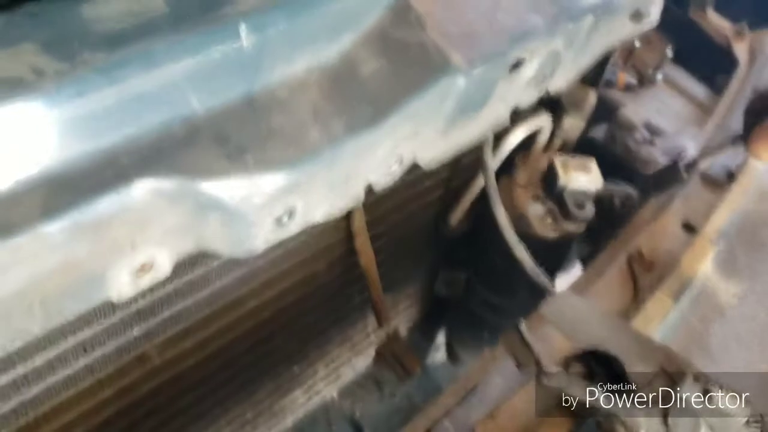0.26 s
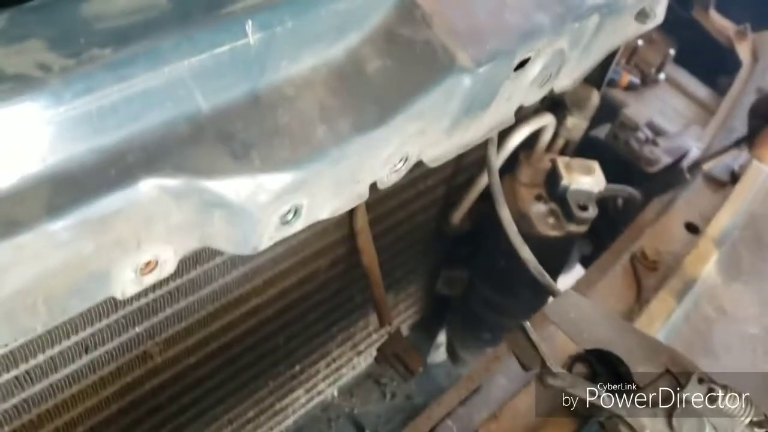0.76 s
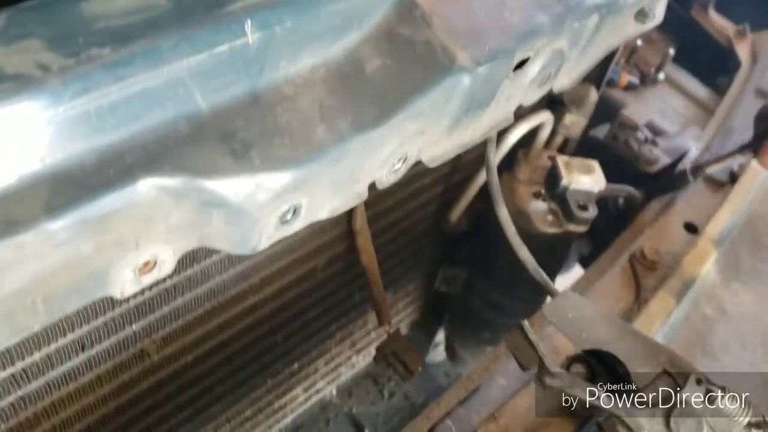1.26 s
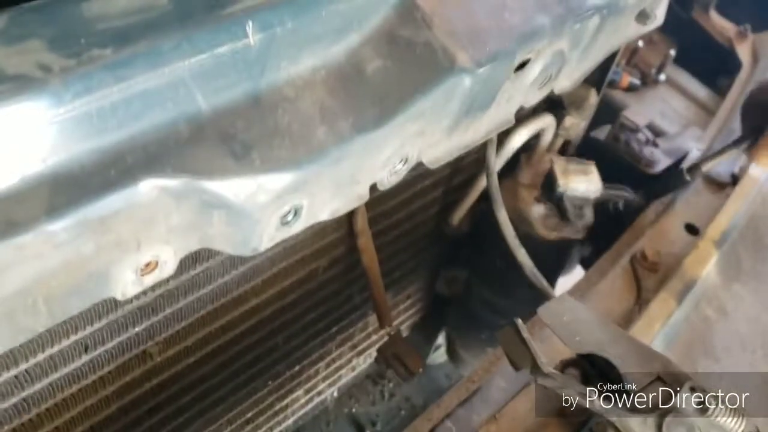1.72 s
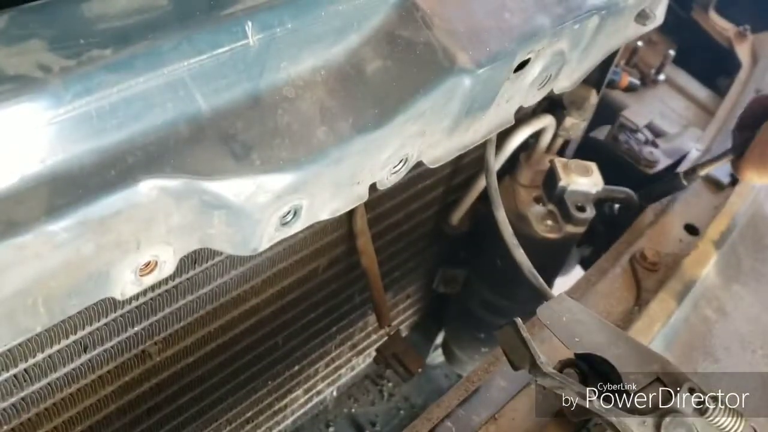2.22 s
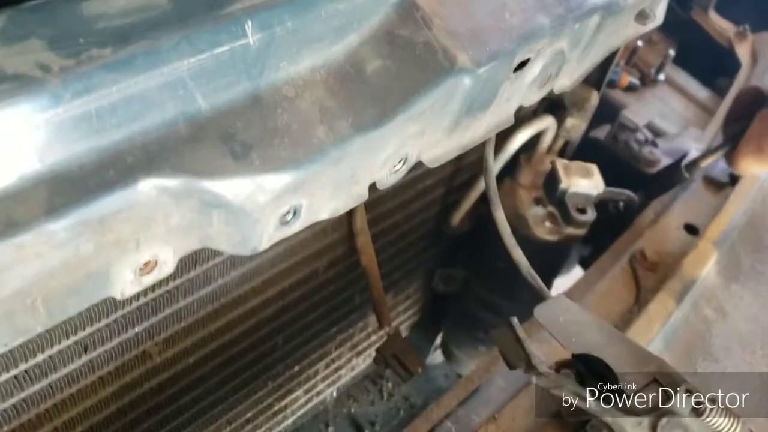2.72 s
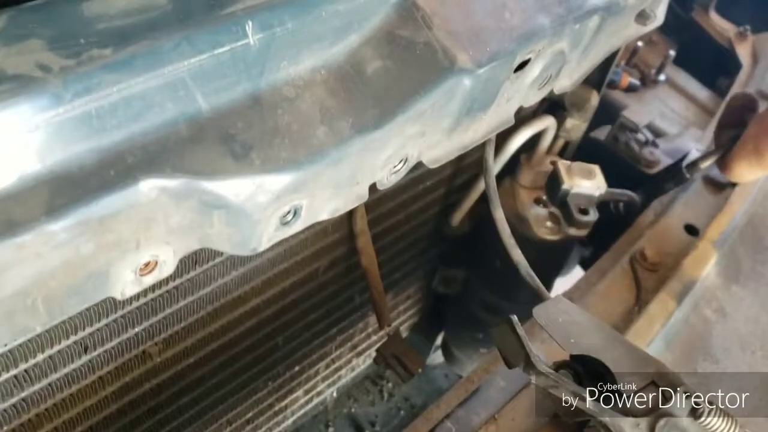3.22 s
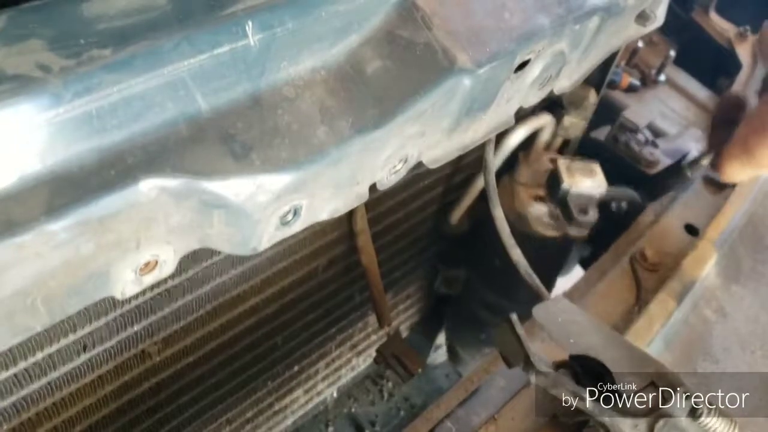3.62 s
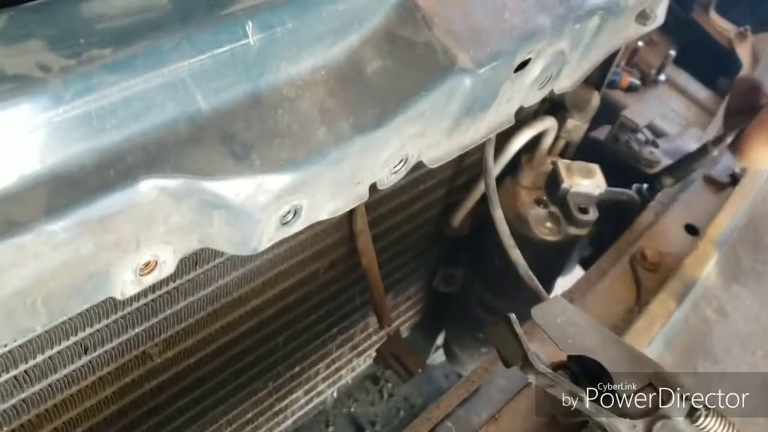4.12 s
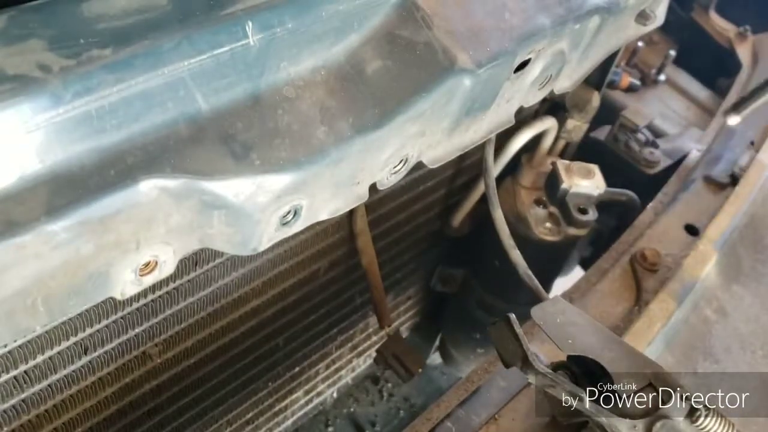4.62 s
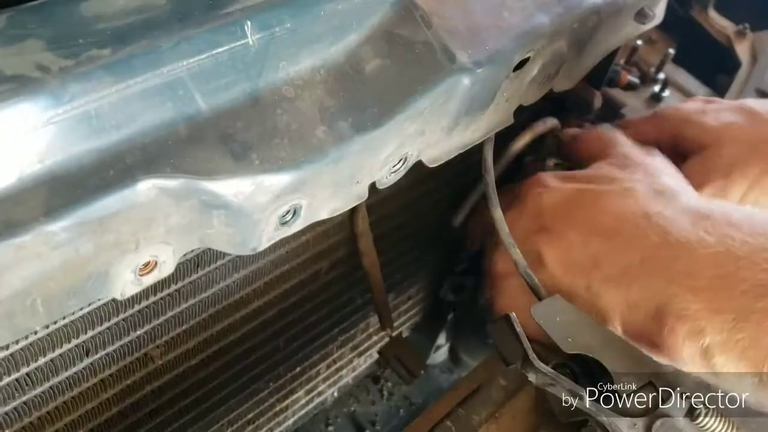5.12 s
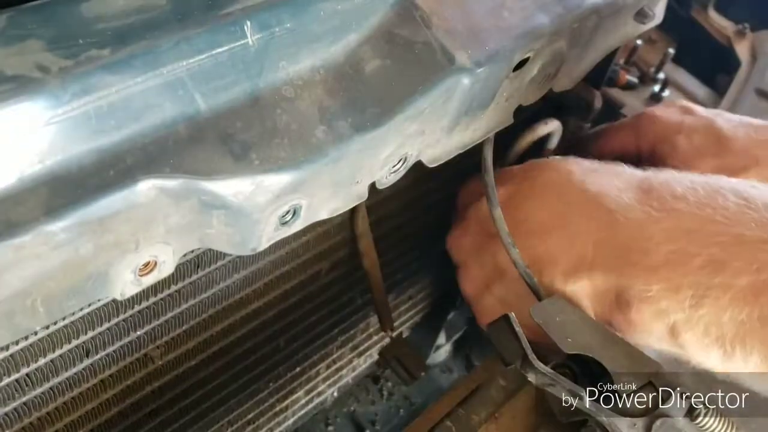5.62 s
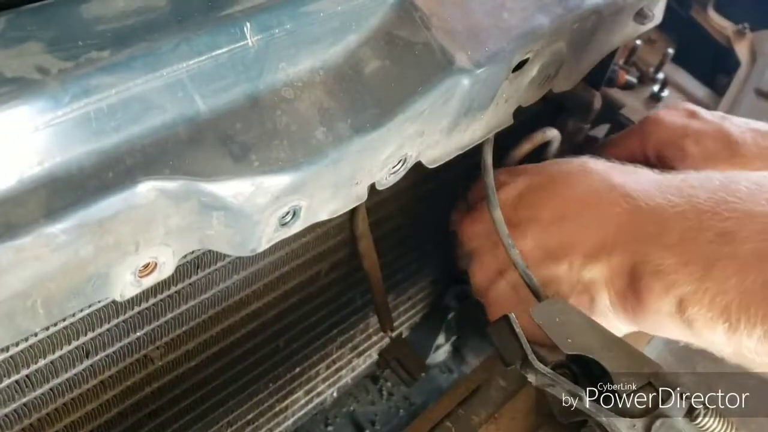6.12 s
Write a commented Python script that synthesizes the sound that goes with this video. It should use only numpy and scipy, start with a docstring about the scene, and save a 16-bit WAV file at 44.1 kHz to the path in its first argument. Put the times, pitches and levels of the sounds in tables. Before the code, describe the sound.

Close up in a car's engine bay, a cordless ratchet starts with a faint high whistle and runs steadily for under two seconds, buzzing and clacking rapidly. After a pause come three short, rough, loaded bursts, the last longest. Then a few dull knocks and a bright steel clank, another double knock, and a tiny metal squeak. Faint machine hum in a small, fairly dry garage.

```python
"""Cordless ratchet in an engine bay

A cordless ratchet works on fittings close by: one long run, then three short bursts. At each start its
motor whistles as two parting tones; the gears growl as noise and hum as harmonics of the stroke rate, and
the pawl clacks in splashes of noise at each swing of the yoke. Knocks on the car (noise and decaying modes)
fall among and after the bursts; a stick-slip metal squeak ends the scene, in a garage where a machine hums.
"""
import sys
import numpy as np
from scipy import signal
from scipy.fft import rfft, irfft
from scipy.io import wavfile
from scipy.ndimage import uniform_filter1d

SR = 44100
rng = np.random.default_rng(int(sys.argv[2]) if len(sys.argv) > 2 else 0)


def dump_mix(stems):
    """Bounce the given channels to the path in sys.argv[1] as a 16-bit WAV at rate SR."""
    frames = np.atleast_2d(stems).T  # one column per channel
    limited = np.clip(frames, -1, 1)  # hard clip at full scale
    pcm = np.round(limited * 32767).astype(np.int16)
    wavfile.write(sys.argv[1], SR, pcm)


N = 280476

# All levels are relative, ahead of the trims in the functions.
# Hum of a machine in the garage: pitch_hz, level_db, level_in_quiet_stretch_db
MACHINE_HUM = [(81.9, -47.5, -62.5), (164, -45, -64), (240, -47.5, -65.5), (325.5, -51, -77),
               (472, -57.5, -78.5), (529, -52, -79.5), (837, -62, -81.5), (928, -58.5, -87)]
# Spectral density of the garage air, outside and inside the quiet stretch: frequency_hz, density_db
GARAGE_AIR = [(15, -41), (25, -8.5), (71, -0.5), (131, -8), (158, -1), (191, -13.5), (237, 1), (293, -14.5),
              (326, -15), (475, -3.5), (655, -11.5), (1120, -13.5), (6040, -26.5), (8780, -34.5),
              (15000, -31.5)]
QUIET_AIR = [(15, -35.5), (25, -6.5), (150, -1.5), (191, -13.5), (237, -2.5), (286, -14), (501, -8),
             (604, -12), (6900, -30), (8780, -40), (15000, -34.5)]
# Reverberation time of the garage: frequency_hz, t60_s
GARAGE_T60 = [(150, .6), (1000, 0.39), (4000, 0.32), (14000, 0.13)]
# Side against mid of noise and gear hum in the stereo image: frequency_hz, side_to_mid_db
STEREO_WIDTH = [(30, -3), (65, -7), (140, -15), (280, -11), (550, -4), (1100, 0), (4000, 1), (14000, -1)]
# Path of the squeaking fitting: time_s, pitch_hz, level_db
SQUEAK_PATH = [(6.328, 1370, -38), (6.336, 1334, -33), (6.347, 1417, -27), (6.36, 1340, -40)]
# Partials of the squeak: multiple (of the pitch), level_db
SQUEAK_PARTIALS = [(1, -2.5), (2, -3), (3, -10), (4, -21), (5, -19)]
# Modes of a struck steel bracket: frequency_hz, level_db, t60_s (before t60_scale)
BRACKET_MODES = [(1130, -4.5, 0.25), (1389, -1.5, 0.31), (1561, -2, 0.21), (1840, 0, 0.33),
                 (2751, -7, 0.33), (2912, -8, 0.27), (4780, -3, 0.2)]
# Knocks of tool and hand on the car: start_s, body_db, clash_to_body_db, chatter_s, resonance_hz, tick_to_clash_db
CAR_KNOCKS = [(2.30, -64, -18, 0.026, 700, -8), (2.529, -62.5, -3.5, 0.0046, 900, -8),
              (4.148, -60.5, 6.5, 0.027, 905, -4), (4.177, -36.5, -9, 0.0051, 836, 6),
              (4.215, -36.5, -18, 0.0053, 896, 5), (4.326, -53, -3, .006, 1900, -12),
              (4.339, -51.5, 2, 0.0086, 2030, -9), (4.460, -34.5, -0.5, 0.017, 600, 0),
              (4.4834, -28, 10, 0.0089, 1316, 0), (5.2771, -31, 1, 0.0046, 1950, -22),
              (5.285, -28, -25, 0.0018, 567, -20)]
# Spectral density of a knock's dull panel, bright clash and treble tick: frequency_hz, density_db
PANEL_COLOUR = [(60, -6.5), (250, -2), (550, 1.5), (950, 2.5), (1600, -13), (4000, -19.5), (15000, -35)]
CLASH_COLOUR = [(200, -24.5), (900, -7.5), (1900, 2), (3200, -5), (6500, -6), (9000, -18), (14500, -25)]
TICK_COLOUR = [(2000, -45), (8000, -16), (10500, -5), (14500, 1)]
# Modes of the steel socket: frequency_hz, level_db, t60_s
SOCKET_MODES = [(4021, -26.5, 0.29), (6067, -46.5, .3), (6761, -42, .3)]
# Pulls of the trigger: trigger_s, bite_s, release_s, growl_at_release_db, rasp_at_release_db,
# load_build_up_db (from bite to release), first_pawl_tick_db
TRIGGER_PULLS = [(0.101, 0.161, 1.825, -28, -22, 0, -29.5), (2.581, 2.641, 2.755, -23, -15.5, 13.5, -35),
                 (3.023, 3.071, 3.232, -23.5, -17.5, 6.5, -60.5), (3.4558, 3.523, 3.88, -20.5, -12, 7, -28)]
# The tool spinning freely at one speed: time_s, steady_hum_share (0-1)
FREE_SPIN = [(.17, 0), (.33, .85), (.6, .96), (1.42, .95), (1.52, 0)]
# Harmonics of the gear hum: multiple (of the stroke rate), level_db
GEAR_HARMONICS = [(1, -18.5), (2, -11.5), (3, -5), (4, 1), (5, -25), (6, -3.5), (7, -5.5), (8, -7),
                  (9, -13), (10, -7), (11, -9), (12, -9), (13, -19.5), (14, -23), (15, -8.5), (16, -11),
                  (17, -20), (18, -19), (19, -18.5), (20, -17.5), (21, -11.5), (22, -16.5), (23, -7.5),
                  (24, -10.5), (25, -16), (26, -22.5), (27, -19), (28, -16.5)]
# Spectral density of gear growl, panel rumble and steel parts: frequency_hz, density_db
GROWL_COLOUR = [(30, -33), (68, -4), (95, -9.5), (145, 0), (180, 0), (230, 2), (330, -.5), (440, 2.5),
                (650, -1), (900, -6), (1300, -13.5), (2000, -9.5), (5000, -19)]
RUMBLE_COLOUR = [(28, -45.5), (52, -24), (68, 0), (85, -2), (130, -26.5), (600, -69)]
STEEL_COLOUR = [(100, -20.5), (400, -1.5), (900, -2), (1300, -0.5), (1900, -5), (2700, 2), (3400, 0),
                (4300, 1.5), (5500, -2.5), (7000, -2), (8700, -8.5), (10500, -3.5), (14500, 0), (16000, -4)]
# Stretches of ratcheting under load: first_stroke_s, end_s, stroke_gap_s, gap_growth_s (with each stroke)
LOADED_STRETCHES = [(.169, .235, .0222, -.0018), (1.4855, 1.93, .0208, .0004), (2.652, 2.79, .0215, .0014),
                    (3.068, 3.34, .0243, .00046), (3.523, 3.86, .0282, -.0002)]
# Strength of the clacks in each of those stretches: level_db
LOADED_LEVELS = [-14.5, -14.8, -9.5, -13.5, -10]
# Hard catches of the pawl: start_s, level_db
HARD_CATCHES = [(0.2105, -9.5), (1.7882, -9.5), (1.8185, -11.5), (2.6973, -10), (2.7246, -8.5),
                (3.0664, -14.5), (3.12, -12), (3.1642, -7.5), (3.1955, -10.5), (3.2782, -17.5),
                (3.551, -10), (3.583, -11), (3.6312, -6.5), (3.691, -7.5)]

# the background is much quieter between these times (s)
QUIET_FROM_S, QUIET_TO_S = 0.093, 4.956
# the tool kicks, and its socket is set ringing (s)
THUMP_S, RING_S = 2.675, 2.725
# single strokes, drive and return alike, per second, and the limits of the free run's clacks
STROKE_HZ, FREE_FROM_S, FREE_TO_S = 56.55, .2432, 1.475
# every pull: the motor takes up the slack, bites quickly and coasts down after the release
SLACK_S, SLACK_DB, BITE_S = .024, -21.5, .016
GROWL_COAST_DB_PER_S, RASP_COAST_DB_PER_S, CLACK_COAST_DB_PER_S = 225.5, 290, 140.5
# share of the load's build-up that the clacks follow (0-1), their scatter (dB), contact at full force (s)
CLACK_LOAD_SHARE, CLACK_SCATTER_DB, CHATTER_S = .5, 0.9, .0045
TOP_HZ = 15500


def undb(db):
    """Logarithmic level: decibels become an amplitude ratio."""
    return 10 ** (np.asarray(db) / 20)


def unit(x):
    """Normalisation: a signal is scaled to an rms of 1."""
    return x / np.sqrt(np.mean(x ** 2))


def clock(size=N):
    """Uniform sampling: sample times in seconds."""
    return np.arange(size) / SR


def fade(t, t60):
    """Exponential damping: amplitude is 60 dB down after t60."""
    return np.exp(-np.log(1000) * t / t60)


def on_log(hz, points):
    """Logarithmic frequency scale: (Hz, value) points are interpolated along it."""
    f, value = np.transpose(points)
    return np.interp(np.log(np.maximum(hz, 1)), np.log(f), value)


def walk(rate):
    """Low-pass fluctuation: random steps, rate per second, are smoothed twice and scaled to an rms of 1."""
    size = int(SR / rate)
    held = np.repeat(rng.standard_normal(N // size + 1), size)
    return unit(uniform_filter1d(uniform_filter1d(held, size), size)[:N])


def noise(colour, size=N, ripple_db=0., ripple_hz=120):
    """Partial coherence: coloured noise at two microphones is alike in the bass; ripple stands for resonances."""
    hz = np.fft.rfftfreq(size, 1 / SR)
    mid, side = np.exp(2j * np.pi * rng.random((2, len(hz))))
    width = undb(on_log(hz, STEREO_WIDTH))
    pair = np.array([mid + width * side, mid - width * side]) / np.hypot(1, width)
    ripple = np.interp(hz / ripple_hz, np.arange(2 ** 10), rng.standard_normal(2 ** 10))
    ripple = ripple * np.minimum(hz / 1000, 1)  # weaker below 1 kHz
    spectrum = pair * undb(on_log(hz, colour) + ripple_db * ripple)
    return unit(irfft(spectrum, size))


def partials(hz, orders, blur=1., start_s=0.):
    """Harmonic synthesis: multiples of a moving pitch, rms 1; little blur aligns the low ones into a thud a cycle."""
    turn = np.cumsum(hz) / SR
    turn = turn - np.interp(start_s, clock(), turn)
    turn = (turn % 1).astype(np.float32)
    total = 0
    for multiple, db in orders:
        phase = float(min(blur * multiple, 1) * rng.random())
        total = total + float(undb(db)) * np.sin(2 * np.pi * (round(multiple) * turn + phase))
    return unit(total)


def blows(rows, snap, t60, bay_db, bay_t60):
    """Impact envelope: hard first contact, chatter, a short ring and bay reflections add in power."""
    power, age = np.zeros(N + SR), clock(SR // 3)
    first_contact = 1 + snap * fade(age, 0.0025)
    reflections = undb(bay_db) * fade(age, bay_t60)
    for s, db, chatter_s in rows:
        contact = first_contact * fade(np.maximum(age - chatter_s, 0), t60)
        start = int(s * SR)
        power[start:start + len(age)] += undb(db) ** 2 * (contact ** 2 + reflections ** 2)
    return np.sqrt(power[:N])


def background(shop_db=-39.5, lull_db=-59.0, swell_db_per_s=3.0, lull_rise_db_per_s=1.7, drop_db=-9, drop_t60=.25):
    """Tones in broadband flow noise: hum and air drop, creep up through the quiet stretch, then return at once."""
    t = clock()
    quiet = (t > QUIET_FROM_S) & (t < QUIET_TO_S)
    creep_db = lull_rise_db_per_s * (t - t.mean())
    hum = 0
    for hz, db, quiet_db in MACHINE_HUM:
        level_db = np.where(quiet, quiet_db + creep_db, db) + 1.9 * walk(7.8)
        pitch = hz * (1 + .006 * walk(11))
        hum = hum + undb(level_db) * np.sin(2 * np.pi * np.cumsum(pitch) / SR)
    late_swell_db = swell_db_per_s * np.maximum(t - 5.6, 0)
    air = noise(GARAGE_AIR) * undb(shop_db + 0.89 * walk(14) + late_swell_db)
    lull = noise(QUIET_AIR) * undb(lull_db + creep_db + walk(12))
    dying = undb(drop_db) * fade(np.maximum(t - QUIET_FROM_S, 0), drop_t60)
    return hum + np.where(quiet, lull + dying * air, air)


def garage(x, wet_db=-16, build_s=0.0065, size=32768):
    """Diffuse reverberation: convolution with a noise tail whose treble dies first."""
    t, hz = clock(size), np.fft.rfftfreq(size, 1 / SR)
    white = rfft(noise([(20, 0), (20000, 0)], size))
    octave = np.round(np.log2(np.maximum(hz, 2 ** 6)))
    tail = 0
    for k in np.unique(octave):
        band = irfft(white * (octave == k))
        tail = tail + band * fade(t, on_log(2 ** k, GARAGE_T60))
    tail = unit(tail * (1 - np.exp(-t / build_s))) / np.sqrt(size)
    return undb(wet_db) * signal.fftconvolve(x, tail, axes=1)[:, :N]


def squeak():
    """Stick-slip friction: metal gives a high harmonic tone, unsteady in rate and strength."""
    s, hz, db = np.transpose(SQUEAK_PATH)
    pitch = np.interp(clock(), s, hz) * (1 + .022 * walk(500))
    level_db = np.interp(clock(), s, db, left=-np.inf) + 2 * walk(400)
    return partials(pitch, SQUEAK_PARTIALS) * undb(level_db)


def bracket(db=-33, t60_scale=0.97):
    """Modal ringing: every knock excites a steel bracket in proportion to its bright clash."""
    age = clock(SR // 2)
    top_db = max(mode[1] for mode in BRACKET_MODES)
    ring = 0
    for hz, mode_db, t60 in BRACKET_MODES:
        tone = np.sin(2 * np.pi * (hz * age + rng.random((2, 1))))  # one phase per channel
        ring = ring + undb(mode_db - top_db) * tone * fade(age, t60 * t60_scale)
    hardest_db = max(body + clash for _, body, clash, *_ in CAR_KNOCKS)
    out = np.zeros((2, N + SR))
    for s, body, clash, *_ in CAR_KNOCKS:
        start = int(s * SR)
        out[:, start:start + len(age)] += undb(db + body + clash - hardest_db) * ring
    return out[:, :N]


def knocks(ring_db=1.0, ring_t60=0.073):
    """Impact excitation: a dull sheet-metal body, a bright steel clash, its tick and one main resonance."""
    s, db, clash, chatter, hz, tick = np.transpose(CAR_KNOCKS)
    dull = blows(zip(s, db, chatter), snap=0.18, t60=0.064, bay_db=-6.5, bay_t60=0.25)
    bright = blows(zip(s, db + clash, chatter), snap=0.77, t60=0.031, bay_db=-5.0, bay_t60=0.22)
    sharp = blows(zip(s, db + clash + tick, chatter), snap=0.8, t60=0.03, bay_db=-6, bay_t60=0.18)
    ring, age = np.zeros(N + SR), clock(SR // 4)
    for start, blow_db, ring_hz in zip((s * SR).astype(int), db, hz):
        tone = np.sin(2 * np.pi * ring_hz * age) * fade(age, ring_t60)
        ring[start:start + len(age)] += undb(blow_db + ring_db) * tone
    body = dull * noise(PANEL_COLOUR, ripple_db=1.5)
    steel = bright * noise(CLASH_COLOUR, ripple_db=1.2)
    return body + steel + sharp * noise(TICK_COLOUR) + ring[:N]


def jolt(thump_hz=75, thump_db=-16, thump_t60=0.067, ring_spread_hz=130):
    """Free vibration: one kick thumps low through the car, then the loose socket rings at unsteady pitch."""
    age = np.maximum(clock() - THUMP_S, 0)
    thump = -undb(thump_db) * np.sin(2 * np.pi * thump_hz * age) * fade(age, thump_t60)
    age = np.maximum(clock() - RING_S, 0)
    rattle = np.cumsum(ring_spread_hz * walk(300) * (age > 0)) / SR  # shared phase wander, cycles
    ring = 0
    for hz, db, t60 in SOCKET_MODES:
        ring = ring + undb(db) * np.sin(2 * np.pi * (hz * age + rattle)) * fade(age, t60)
    return thump + ring


def motor_whistle(switch_hz=9950, spread_hz_per_s=9000, db=-55, length_s=0.051):
    """Amplitude modulation: the drive's switching tone splits into sidebands that part as the rotor speeds up."""
    out = np.zeros(N)
    for s, *_ in TRIGGER_PULLS:
        age = np.clip(clock() - s, 0, length_s)
        swell = np.sqrt(np.abs(np.sin(np.pi * age / length_s)))
        modulation = np.cos(np.pi * spread_hz_per_s * age ** 2)
        out += swell * np.sin(2 * np.pi * switch_hz * age) * modulation
    return 2 * undb(db) * out  # each sideband carries half the product


def drive(t, pull, coast_db_per_s, load_share=1):
    """Loaded drive: gain through slack, bite, a load that builds until the release, then coasting."""
    trigger, bite, release, _, _, build_db, _ = pull
    attack_db = np.interp(t, [bite - BITE_S, bite], [SLACK_DB, 0])
    load_db = load_share * np.interp(t, [bite, release], [-build_db, 0])
    coast_db = coast_db_per_s * np.maximum(t - release, 0)
    return (t > trigger + SLACK_S) * undb(attack_db + load_db - coast_db)


def effort():
    """Load dependence: gains of gear growl and tooth rasp over time, and how freely the tool spins."""
    t = clock()
    growl = sum(undb(pull[3]) * drive(t, pull, GROWL_COAST_DB_PER_S) for pull in TRIGGER_PULLS)
    rasp = sum(undb(pull[4]) * drive(t, pull, RASP_COAST_DB_PER_S) for pull in TRIGGER_PULLS)
    free = np.interp(t, *np.transpose(FREE_SPIN))
    return growl, rasp, free


def gear_hum(growl, free, db=0.9, side_db=-10, swing=0.3, swing_lead_s=.003):
    """Periodic excitation: the free gear train thuds after each stroke, a buzz that swells on drive strokes."""
    speed = STROKE_HZ * (1 + .0009 * walk(9))
    mid = partials(speed, GEAR_HARMONICS, blur=.075, start_s=FREE_FROM_S + .012)
    side_orders = [(k, order_db + on_log(k * STROKE_HZ, STEREO_WIDTH)) for k, order_db in GEAR_HARMONICS]
    side = partials(speed, side_orders)
    # one cycle spans a drive and a return stroke
    load = 1 + swing * np.cos(np.pi * STROKE_HZ * (clock() - FREE_FROM_S + swing_lead_s))
    stereo = mid + undb(side_db) * side * np.array([[1], [-1]])
    return undb(db) * growl * load * np.sqrt(free) * stereo


def gear_grind(growl, rasp, free, growl_db=0.5, rasp_db=-6, rumble_db=-30, grain_db=2.5):
    """Rough contact: loaded teeth growl and rasp unevenly; the heaviest load shakes the car's front panel."""
    rough = undb(growl_db) * growl * noise(GROWL_COLOUR, ripple_db=2.5, ripple_hz=60.3)
    rough = rough * unit(undb(1.5 * walk(120)))
    teeth = undb(rasp_db) * rasp * noise(STEEL_COLOUR, ripple_db=2.6) * unit(undb(grain_db * walk(400)))
    rumble = undb(rumble_db) * (growl / growl.max()) ** 3 * noise(RUMBLE_COLOUR)
    return np.sqrt(1 - free) * (rough + rumble) + teeth


def loaded_clacks(tick_chatter_s=.002):
    """Force-dependent contact: slack ticks, hard catches and stroke clacks that shorten as the force fades."""
    # rows: start_s, level_db, chatter_s
    rows = [(pull[0] + SLACK_S, pull[6], tick_chatter_s) for pull in TRIGGER_PULLS]
    rows += [(s, db, CHATTER_S) for s, db in HARD_CATCHES]
    for (s, end, gap, growth), db in zip(LOADED_STRETCHES, LOADED_LEVELS):
        while s < end:
            force = sum(drive(s, pull, CLACK_COAST_DB_PER_S, CLACK_LOAD_SHARE) for pull in TRIGGER_PULLS)
            scatter_db = CLACK_SCATTER_DB * rng.standard_normal()
            stroke_db = db + 20 * np.log10(force + 1e-9) + scatter_db
            # a hard catch takes the place of the stroke nearest to it
            if all(abs(s - caught) > gap / 2 for caught, _ in HARD_CATCHES):
                chatter_s = np.interp(force, [0, 1], [tick_chatter_s, CHATTER_S])
                rows.append((s, stroke_db, chatter_s))
            s, gap = s + gap + growth / 2, gap + growth
    return rows


def pawl(drive_db=-14.5, scatter_db=0.6, uneven_db=-2.0, grain_db=1.5):
    """Repeated impact: the yoke gives a hard clack on the drive stroke, a lighter, dragging one on the return."""
    times = np.arange(FREE_FROM_S, FREE_TO_S, 1 / STROKE_HZ)
    driving = np.arange(len(times)) % 2 == 0
    db = drive_db + np.where(driving, 0, -5.5) + scatter_db * rng.standard_normal(len(times))
    chatter_s = np.where(driving, .006, .009)
    even = blows(zip(times, db, chatter_s), snap=.5, t60=.04, bay_db=-15, bay_t60=.15)
    uneven = undb(uneven_db - 3) * blows(loaded_clacks(), snap=.8, t60=.034, bay_db=-15, bay_t60=.16)
    # the steel head has so many modes that each clack is a splash of noise
    splash = noise(STEEL_COLOUR, ripple_db=2.4)
    # in the free run the same parts meet in the same way on every turn of the crank
    turn = splash[:, np.arange(N) % round(2 * SR / STROKE_HZ)]
    repeat = .25  # share of the power that repeats
    varying = np.sqrt((1 - repeat) * even ** 2 + uneven ** 2) * splash
    sound = varying + np.sqrt(repeat) * even * turn
    return sound * unit(undb(grain_db * walk(1500)))


def scene(left_db=0.56):
    """Superposition: sources and their reverberation, gear hum and background add, a little to the left."""
    growl, rasp, free = effort()
    rattle = squeak() + bracket() + knocks() + jolt() + motor_whistle()
    rattle = rattle + gear_grind(growl, rasp, free) + pawl()
    total = background() + garage(rattle) + gear_hum(growl, free) + rattle
    return total * undb([[left_db], [-left_db]])


def record(dry, low_cut_hz=34):
    """Band limiting and saturation: the phone thins the deepest bass, rounds high peaks and cuts the top."""
    thin = signal.sosfilt(signal.butter(2, low_cut_hz, "high", fs=SR, output="sos"), dry)
    rounded = np.tanh(0.74 * thin) / 0.66
    return signal.sosfilt(signal.ellip(8, .2, 70, TOP_HZ, fs=SR, output="sos"), rounded)


dry = scene()
out = record(dry)
dump_mix(out)
```